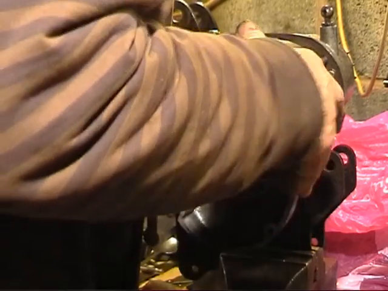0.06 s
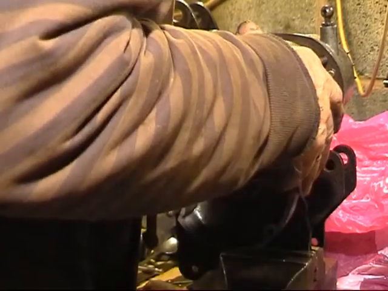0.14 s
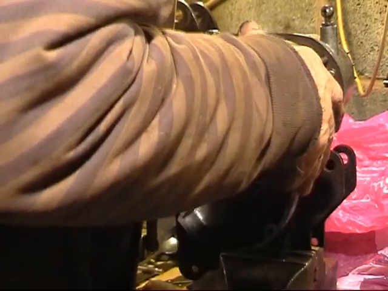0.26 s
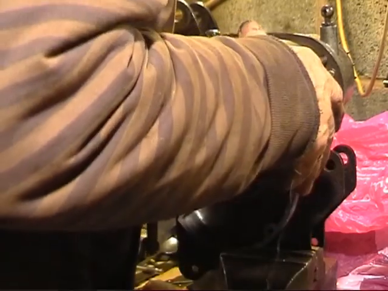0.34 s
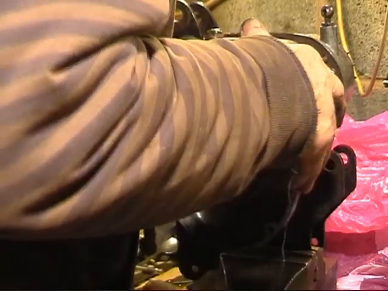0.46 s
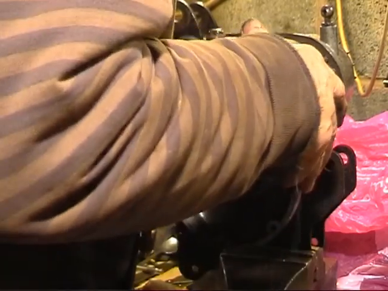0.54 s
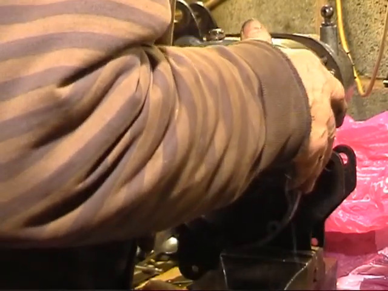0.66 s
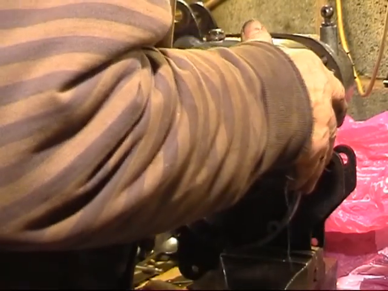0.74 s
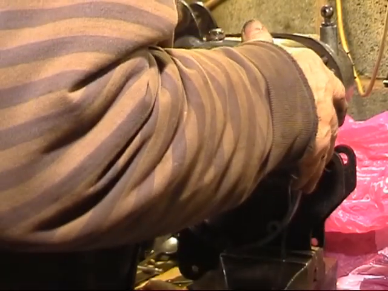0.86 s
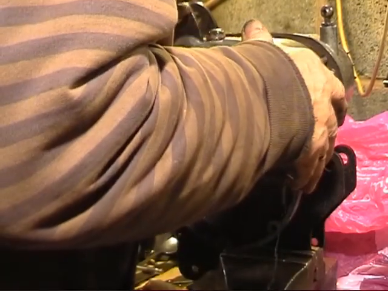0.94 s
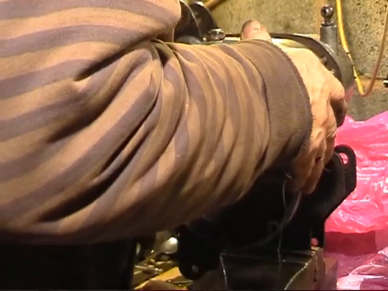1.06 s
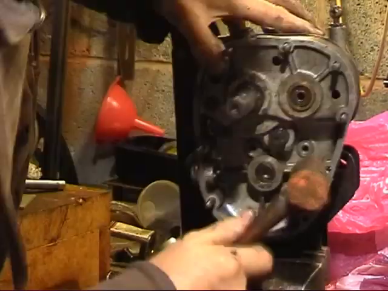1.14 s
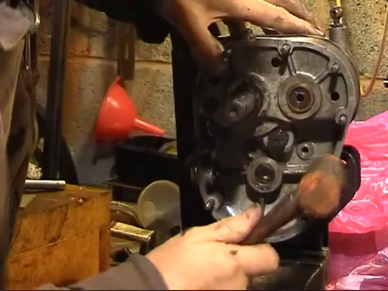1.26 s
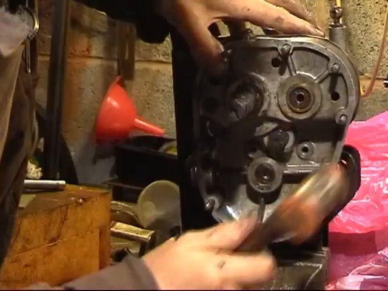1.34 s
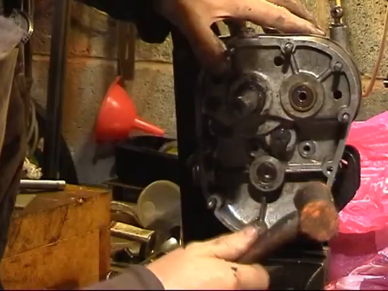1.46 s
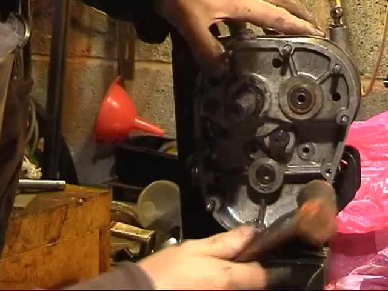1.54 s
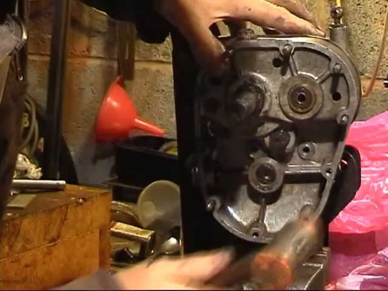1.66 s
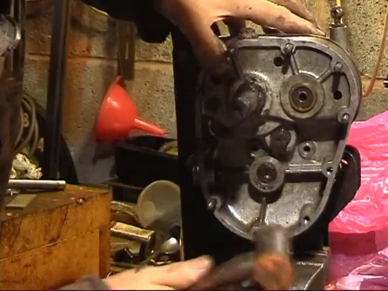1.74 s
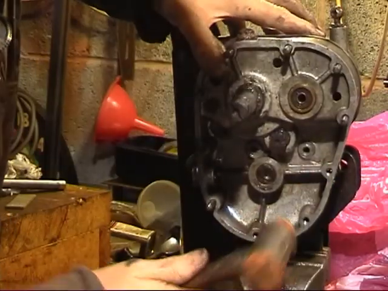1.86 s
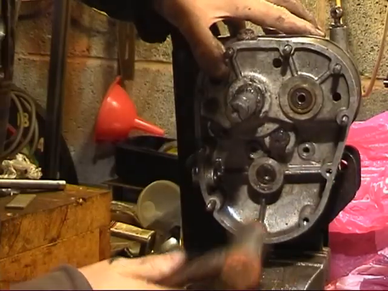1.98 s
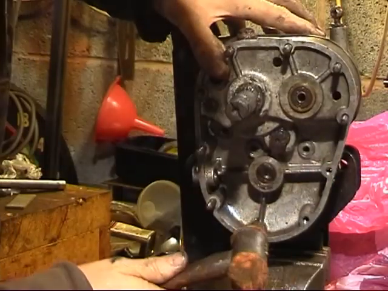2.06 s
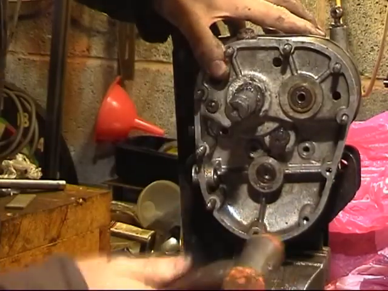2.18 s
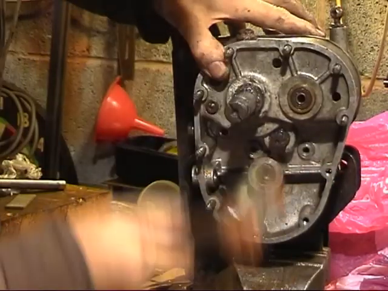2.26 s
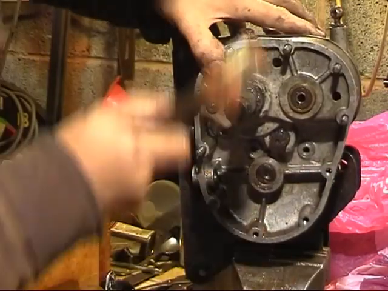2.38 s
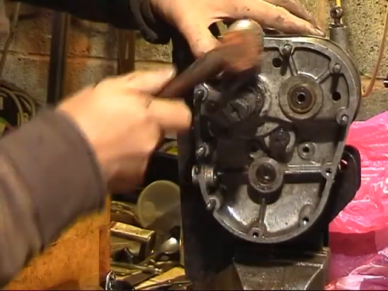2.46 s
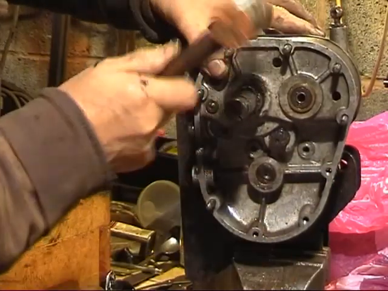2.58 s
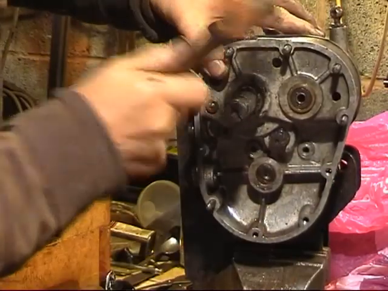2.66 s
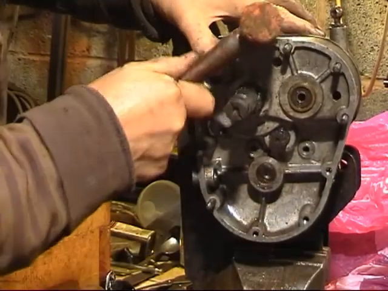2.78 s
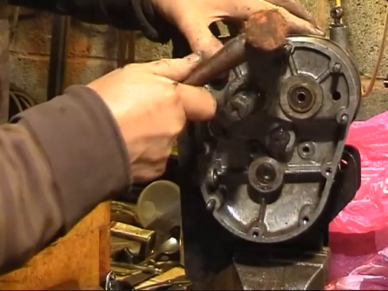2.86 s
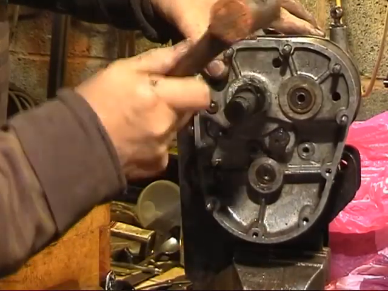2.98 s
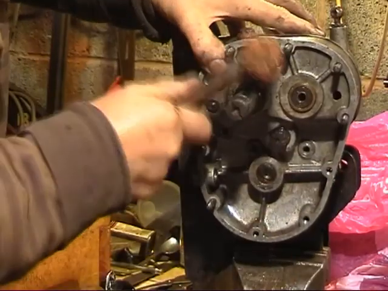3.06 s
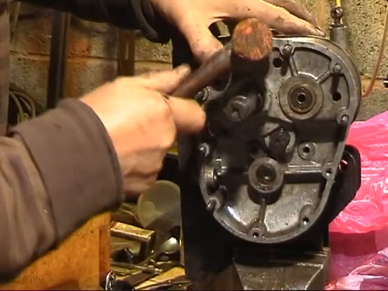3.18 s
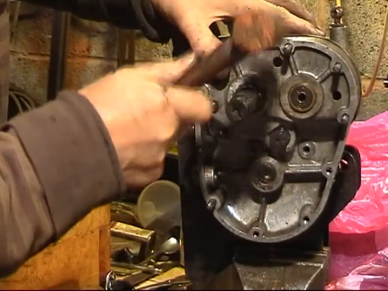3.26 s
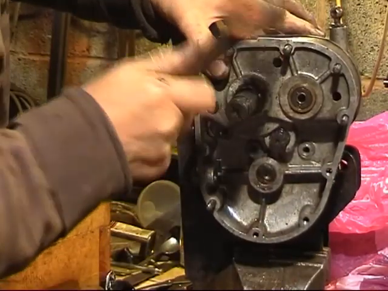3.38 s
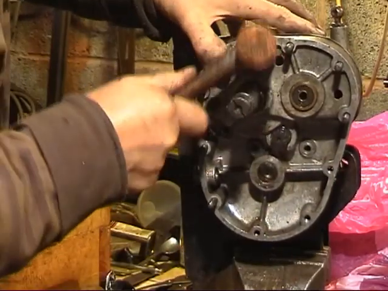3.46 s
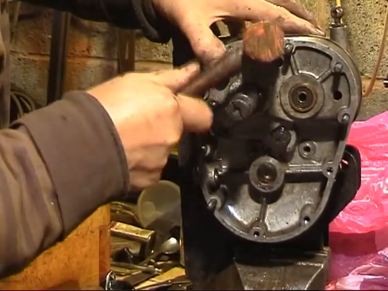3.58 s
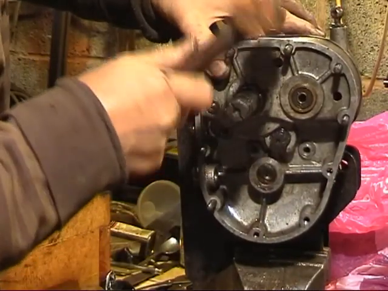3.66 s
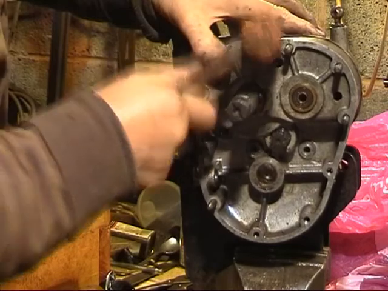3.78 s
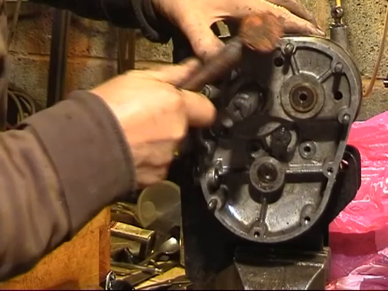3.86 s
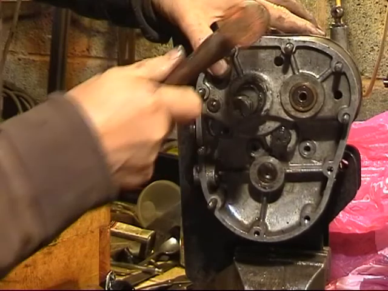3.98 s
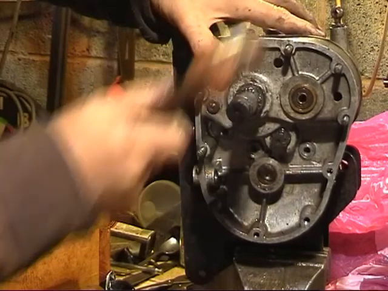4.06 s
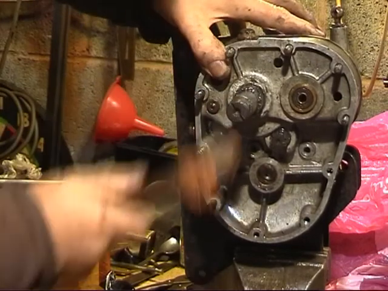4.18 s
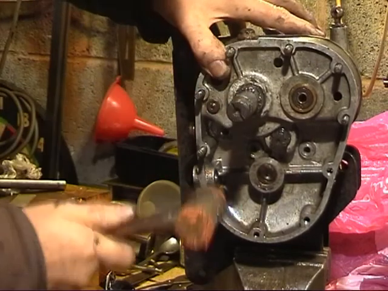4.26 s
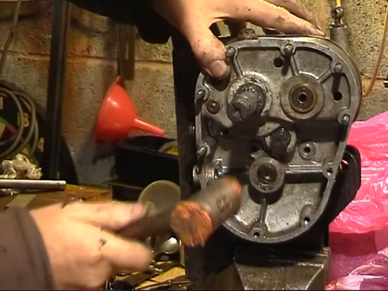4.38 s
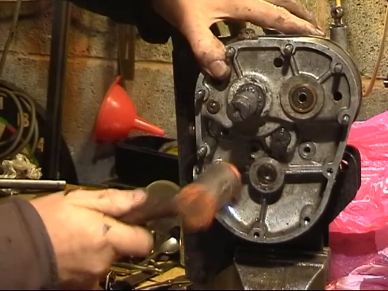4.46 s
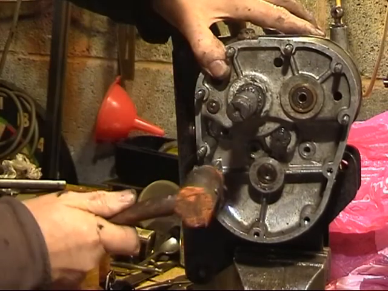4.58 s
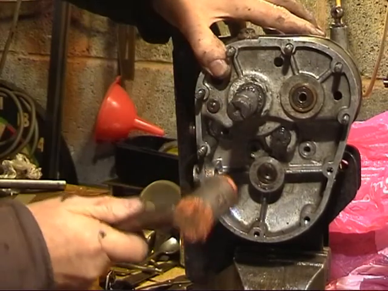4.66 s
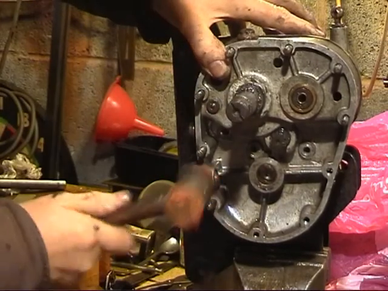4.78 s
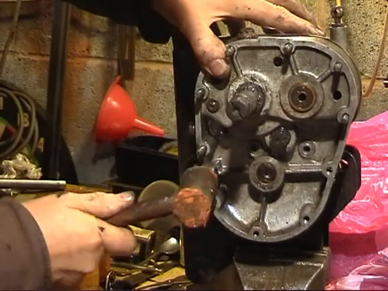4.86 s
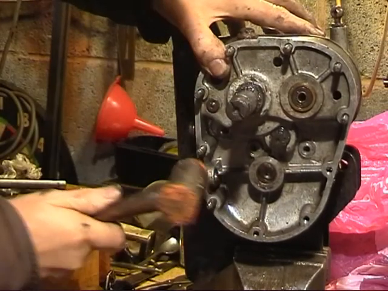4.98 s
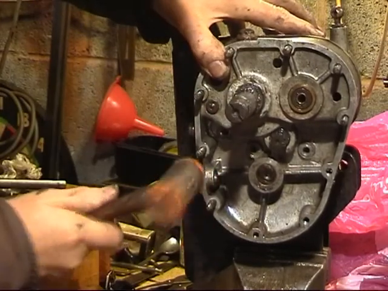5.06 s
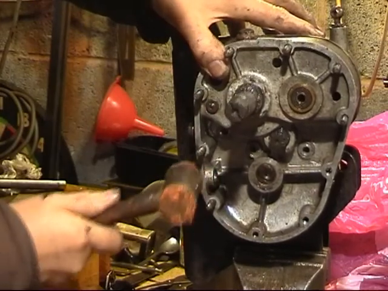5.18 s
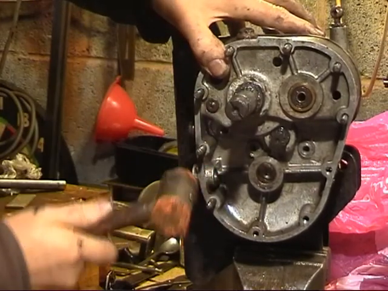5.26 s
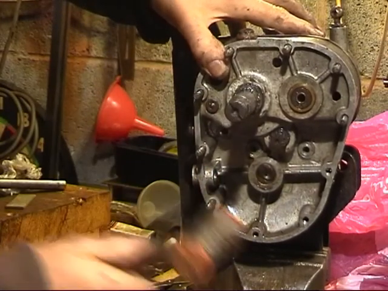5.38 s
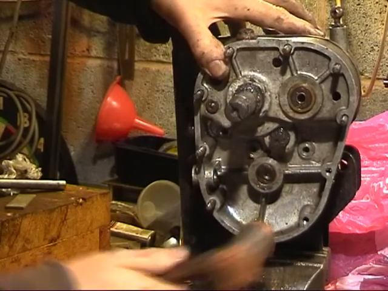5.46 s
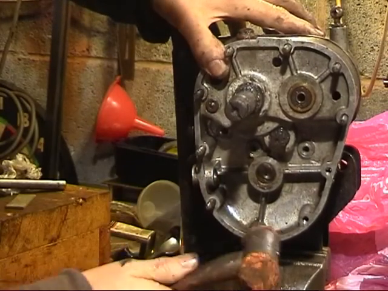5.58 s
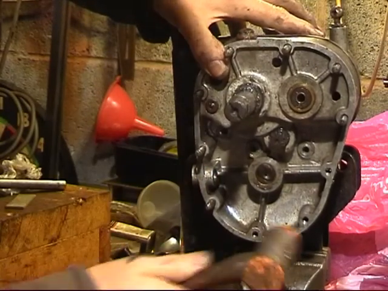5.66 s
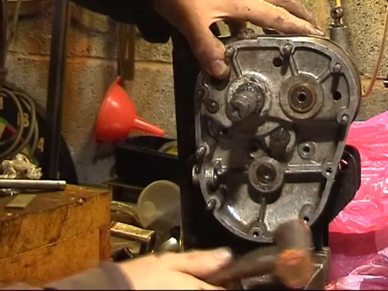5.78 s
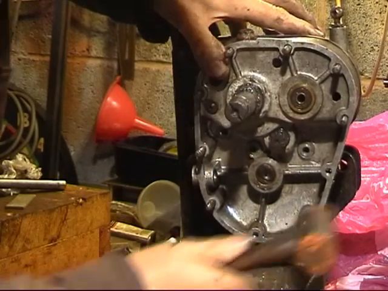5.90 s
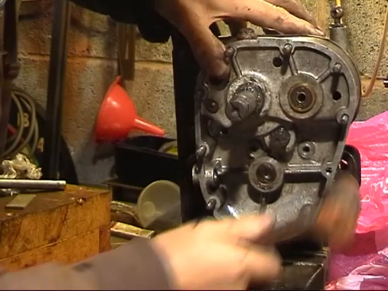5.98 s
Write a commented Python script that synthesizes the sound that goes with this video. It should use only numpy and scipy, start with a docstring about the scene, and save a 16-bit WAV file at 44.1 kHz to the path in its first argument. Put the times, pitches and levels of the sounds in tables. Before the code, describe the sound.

Close, dry mallet blows on a clamped metal gearbox casing, about three or four a second within each run. First only cloth scuffs and faint hum and hiss, then an instant of silence and the tail of a blow. Three full clanks, a thin squeak, four more with casing knocks, then a weak tap and five brighter blows. Short room reflections; the microphone distorts on the hardest hits.

```python
"""Hard blows of a mallet clang on a cast metal gearbox casing held in a vice, close by in a small workshop.
Each blow sums damped modes, decaying noise, a crack and a low thump, and the hardest overload the input.
Between them the casing knocks and loose parts tick as enveloped noise; wavering tones make one metal squeak.
A sleeve rustles as uneven noise. Faint steady tones hum under the hiss, which narrows after a brief dropout;
the dying tail of a blow is heard as the sound returns."""
import sys
import numpy as np
from scipy import signal
from scipy.fft import rfft, irfft, next_fast_len
from scipy.io import wavfile

SR = 44100
rng = np.random.default_rng(int(sys.argv[2]) if len(sys.argv) > 2 else 0)


def log_audio(samples):
    """Write samples as a 16-bit WAV file to the path given in sys.argv[1]."""
    # one column per channel
    frames = np.atleast_2d(samples).T
    # limit to full scale, then quantise
    limited = np.clip(frames, -1, 1)
    pcm = np.round(limited * 32767).astype(np.int16)
    wavfile.write(sys.argv[1], SR, pcm)


N = 265923
RING = np.arange(SR * 3 // 4) / SR  # seconds after a contact
DROPOUT_S, DROPOUT_LENGTH_S = 1.149, 0.013  # the sound drops out for an instant

# Reverberation of the workshop. Each row: frequency in Hz, t60 in seconds.
WORKSHOP_DECAY = [(80, 0.83), (190, 0.57), (320, 0.29), (520, 0.18), (1000, 0.18), (2300, 0.18),
                  (6000, 0.16), (12000, 0.15)]


def amp(db):
    """Decibels to gain."""
    return 10 ** (np.asarray(db) / 20)


def unit(x):
    """Scale to rms 1."""
    return x / np.sqrt(np.mean(x ** 2) + 1e-20)


def along(points, hz):
    """Read (Hz, value) points on a log frequency axis."""
    f, v = np.transpose(points)
    return np.interp(np.log(hz + 1), np.log(f + 1), v)


def filtered(x, response):
    """Multiply the spectrum of x by a response of frequency."""
    n = x.shape[-1]
    m = next_fast_len(n + 8192)
    spectrum = rfft(x, m) * response(np.fft.rfftfreq(m, 1 / SR))
    return irfft(spectrum, m)[..., :n]


def coloured(x, points):
    """Causal minimum-phase filter with the gain of the (Hz, dB) points."""
    size = 4096
    gain = amp(along(points, np.fft.rfftfreq(size, 1 / SR)))
    cepstrum = irfft(np.log(gain))
    # Folding the cepstrum forward in time gives minimum phase.
    cepstrum[1:size // 2] *= 2
    cepstrum[size // 2 + 1:] = 0
    impulse = irfft(np.exp(rfft(cepstrum)))
    return signal.fftconvolve(x, impulse)[:len(x)]


def noise(points, size):
    """Noise of rms 1, coloured by (Hz, dB) points."""
    return unit(filtered(rng.standard_normal(size), lambda hz: amp(along(points, hz))))


def dying(decay):
    """White noise split into overlapping bands, each dying at its own speed."""
    white = rng.standard_normal(len(RING))
    centres, t60s = np.transpose(decay)
    total = np.zeros(len(RING))
    for share, t60 in zip(np.eye(len(decay)), t60s):
        points = list(zip(centres, share))
        band = filtered(white, lambda hz: along(points, hz))
        total += band * amp(-60 * RING / t60)
    return total


def ring(modes, scatter_db):
    """Sum exponentially damped modes, each at a new strength and phase."""
    hz, db, t60 = np.transpose(modes)[:, :, None]
    t = RING[:len(RING) // 2]
    level = db + scatter_db * rng.standard_normal(hz.shape) - 60 * t / t60
    wave = amp(level) * np.sin(2 * np.pi * (hz * t + rng.random(hz.shape)))
    return np.pad(wave.sum(0), (0, len(RING) - len(t)))


def in_room(x, wet_db, gap=0.0072):
    """Add the workshop's answer, a noise tail that builds up over a few milliseconds (gap in seconds)."""
    tail = dying(WORKSHOP_DECAY) * (1 - np.exp(-(RING / gap) ** 2))
    answer = signal.fftconvolve(x, tail / np.linalg.norm(tail))[:len(x)]
    return x + amp(wet_db) * answer


def add(track, s, sound):
    """Mix a sound in at time s."""
    part = track[round(s * SR):][:len(sound)]
    part += sound[:len(part)]


def swell(s, length):
    """A smooth rise and fall of gain around time s."""
    return np.exp(-2 * ((np.arange(N) / SR - s) / length) ** 2)


def background():
    """Steady coloured hiss with constant sine tones for the faint hum and thin electrical whines."""
    # Hum and whines. Each row: frequency in Hz, relative level in dB.
    hum_tones = [(96.9, -73.5), (441.4, -81), (1050, -75.5), (2401, -75), (5701, -89), (6002, -77.5),
                 (6298, -86), (10799, -90.5)]
    # Colour of the hiss. Each row: frequency in Hz, relative level in dB.
    hiss_colour = [(15, -48.5), (25, -24.5), (55, -11), (97, -10.5), (200, -8.5), (263, -14.5), (293, -8),
                   (887, -12.5), (1070, -13.5), (1700, -17.5), (2480, -18.5), (2690, -19), (6210, -23.5),
                   (16000, -30)]
    t = np.arange(N) / SR
    hum = sum(amp(db - 1.5) * np.sin(2 * np.pi * (hz * t + rng.random())) for hz, db in hum_tones)
    return hum + amp(-65) * noise(hiss_colour, N)


def air_width():
    """Hiss that differs between the ears: a wide low rush at first, faint once the dropout begins."""
    # Colour before the dropout. Each row: frequency in Hz, relative level in dB.
    wide_colour = [(15, -36), (25, -8), (53, -0.5), (734, -8), (1190, -11), (1480, -11), (16000, -38)]
    # Colour from the dropout on. Each row: frequency in Hz, relative level in dB.
    narrow_colour = [(15, -33), (25, -5.5), (212, -5), (607, -11.5), (1520, -5.5), (1650, -10.5),
                     (16000, -15.5)]
    early = np.arange(N) / SR < DROPOUT_S
    wide = amp(-61.5) * noise(wide_colour, N)
    narrow = amp(-69) * noise(narrow_colour, N)
    return np.where(early, wide, narrow)


def sleeve():
    """Cloth flaps softly, scuffs, and crackles: noise bands whose uneven gain imitates catching fibres."""
    # Flaps as the arm swings. Each row: middle in seconds, length in seconds, relative level in dB.
    flap_moves = [(0.498, 0.075, -57), (0.6, 0.048, -62)]
    # Brushes of the sleeve. Each row: middle and length in seconds, relative scuff and crackle levels in dB.
    brush_moves = [(0.29, 0.041, -64, -69.5), (0.436, 0.029, -63.5, -56), (.53, 0.059, -57.5, -59.5),
                   (0.578, 0.01, -76, -62), (.835, 0.013, -74, -67), (0.938, 0.054, -58, -71),
                   (1.081, 0.027, -54.5, -68), (4.084, 0.047, -61, -64)]
    # Colour of the scuff. Each row: frequency in Hz, relative level in dB.
    scuff_colour = [(300, 1), (800, 0), (1600, 5.5), (2500, -10), (6000, -38)]
    # Colour of the crackle. Each row: frequency in Hz, relative level in dB.
    crackle_colour = [(1200, -20), (2800, 0.5), (5000, -1.5), (8000, -5), (15000, -32.5)]

    flap_gain = sum(amp(db) * swell(s, length) for s, length, db in flap_moves)
    scuff_gain = sum(amp(db) * swell(s, length) for s, length, db, _ in brush_moves)
    crackle_gain = sum(amp(db) * swell(s, length) for s, length, _, db in brush_moves)
    catches = amp(3.7 * noise([(60, 2.0), (300, -5.5), (1500, -74.5)], N))
    flap = noise([(40, 1.0), (110, 0.0), (180, 10.5), (350, -12), (900, -12.0), (3000, -66)], N)
    scuff = unit(np.sqrt(catches) * noise(scuff_colour, N))
    crackle = unit(catches * noise(crackle_colour, N))
    return flap_gain * flap + scuff_gain * scuff + crackle_gain * crackle


def blow_tail():
    """The dying tail of a mallet blow, decaying noise heard as the sound returns after the dropout."""
    # Parts of the tail. Each row: start in seconds, relative level in dB.
    blow_tails = [(1.164, -26), (1.237, -41.5)]
    # Colour of the tail. Each row: frequency in Hz, relative level in dB.
    blow_tail_colour = [(40, -16.5), (180, 1.5), (300, -8.5), (480, 7), (700, -1.5), (1500, -5), (3000, -9),
                        (7000, -19.5), (11000, -33.5), (16000, -45)]
    out = np.zeros(N)
    for s, db in blow_tails:
        envelope = amp(-60 * RING / 0.064) * (1 - np.exp(-RING / 0.0041))
        tail = noise(blow_tail_colour, len(RING)) * envelope
        add(out, s, amp(db + 4.0) * in_room(tail, wet_db=-5.0))
    return out


def bench():
    """The bench top hums after some blows: low sines that swell and decay."""
    # Hums of the bench. Each row: start in seconds, pitch in Hz, relative level in dB.
    bench_hums = [(3.087, 172.3, -41), (4.564, 182.3, -44), (5.629, 209, -51.5)]
    out = np.zeros(N)
    for s, hz, db in bench_hums:
        envelope = amp(-60 * RING / 0.22) * (1 - np.exp(-RING / .03))
        add(out, s, amp(db + 10.5) * np.sin(2 * np.pi * hz * RING) * envelope)
    return out


def rattles():
    """Dull noise knocks as the casing rocks and settles in the jaws, and tiny ticks of loose parts."""
    # Knocks of the casing. Each row: start in seconds, relative level in dB.
    casing_knocks = [(1.358, -40.5), (3.15, -35.5), (3.516, -32.5), (3.668, -40), (3.887, -33),
                     (4.044, -42.5)]
    # Colour of a knock. Each row: frequency in Hz, relative level in dB.
    knock_colour = [(60, -28), (200, -6.5), (500, 1), (850, -0.5), (1400, -13.5), (3000, -30),
                    (9000, -31.5)]
    # Ticks of loose parts. Each row: start in seconds, relative level in dB.
    loose_ticks = [(1.0755, -42.5), (1.143, -45), (1.3447, -39.5), (1.945, -42), (2.801, -38.5),
                   (3.138, -37), (3.2251, -46.5), (3.594, -42), (3.9555, -37), (5.1781, -30)]
    # Colour of a tick. Each row: frequency in Hz, relative level in dB.
    tick_colour = [(500, -38), (3000, -24.5), (6500, 4.5), (9000, -8.5), (15000, -29)]
    out = np.zeros(N)
    for s, db in casing_knocks:
        envelope = amp(-60 * RING / 0.25) * (1 - np.exp(-RING / 0.0014))
        add(out, s, amp(db - 8.5) * noise(knock_colour, len(RING)) * envelope)
    for s, db in loose_ticks:
        tick = noise(tick_colour, len(RING)) * amp(-60 * RING / 0.009)
        add(out, s, amp(db - 8) * tick)
    return in_room(out, wet_db=-8.5)


def squeak():
    """Metal slides on metal: dry friction makes a few steel tones waver and flutter, with grit around them."""
    # Steel tones. Each row: pitch in Hz, rms waver of the pitch in Hz, relative level in dB.
    steel_tones = [(4425, 40, -.5), (5290, 50, -2), (5470, 50, -1), (8800, 90, -12)]
    peak_s, attack_s, t60_s = 2.463, .014, 0.13

    def waver():
        return noise([(60, 3.0), (250, -6.5), (1000, -64)], N)

    tones = np.zeros(N)
    for hz, width, db in steel_tones:
        flutter = amp(db + 3 * waver())
        tones += flutter * np.sin(2 * np.pi * np.cumsum(hz + width * waver()) / SR)
    grit = noise([(200, -8.5), (900, 3), (3000, -2.5), (6000, 0.5), (10000, -10), (15000, -20.0)], N)
    t = np.arange(N) / SR - peak_s
    attack = np.exp(-(np.minimum(t, 0) / attack_s) ** 2)
    envelope = attack * amp(-60 * np.maximum(t, 0) / t60_s)
    return amp(-41) * envelope * (unit(tones) + amp(-12.5) * grit)


def spot_colour(strength_db, spot_hz, treble_db):
    """Colour of one blow: the struck spot lifts modes near its pitch, contact hardness sets the treble."""
    spot_db, spot_octaves = 5.5, 0.6  # lift and reach of the favoured pitch
    treble_hz = 2190  # the treble shelf takes over around here
    hz = np.geomspace(100, 16000, 40)
    favoured = spot_db * np.exp(-(np.log2(hz / spot_hz) / spot_octaves) ** 2)
    treble = treble_db / (1 + (treble_hz / hz) ** 6)
    return np.column_stack([hz, strength_db + favoured + treble])


def mallet():
    """Each blow cracks, rings the casing's modes and gives a low push; returns direct and room sound."""
    # Mallet blows. Each row: start in seconds, relative strength in dB, pitch the struck spot favours in Hz,
    # treble shelf in dB, relative thump level in dB.
    blows = [(1.4350, -17.5, 630, 4, -41.5), (1.7216, -16, 540, 2, -22), (1.9882, -14.5, 520, -0.5, -24),
             (2.7073, -20, 525, 2.5, -41), (3.05, -19.5, 1600, -1, -44), (3.4195, -18.5, 989, -0.5, -38),
             (3.7827, -19, 770, -1, -27.5), (4.5436, -37.5, 950, 5, -60), (4.7886, -15.5, 860, -1.5, -44.5),
             (5.0903, -20, 1100, -4, -48), (5.492, -18, 1270, 2, -45.5), (5.7528, -17.5, 1340, -3.5, -55),
             (6.0217, -16, 1300, -2.5, -45)]
    # Main modes of the casing. Each row: pitch in Hz, relative level in dB, t60 in seconds before the extra
    # damping.
    casing_modes = [(436.4, -8, 0.092), (517.5, 1, .11), (553.6, 2, 0.055), (657, -5.5, .11),
                    (824, -3, 0.02), (864, -2, 0.052), (946, -11, 0.047), (1007, -10, 0.076),
                    (1011.7, -4, 0.11), (1068, -7.5, 0.12), (1118, -12.5, 0.1), (1368, -6, 0.063),
                    (1452.5, -11, 0.48), (1503, -5, 0.16), (1565, -7, 0.29), (1653, -8.5, .13),
                    (1733, -8, 0.15), (1851, -8.5, 0.1), (1982, -7, 0.12), (2197, -9.5, 0.13),
                    (2271, -9.5, 0.23), (2494, -13.5, 0.23), (2664, -14, 0.37), (3430, -15.5, 0.21),
                    (3594, -8.5, 0.038), (3627, -16.5, .16), (4360, -11.5, .09), (4732, -19, 0.1),
                    (5530, -20, 0.13)]
    # Colour of the crowded modes, and of the room's answer. Each row: frequency in Hz, relative level in dB.
    clang_colour = [(40, -30.5), (95, -14.5), (145, -21.5), (185, -5), (245, -2), (305, -17.5), (410, 1.5),
                    (540, -2), (610, -12), (850, 1), (1500, -1.5), (2300, 0.5), (3000, -6), (4000, -6),
                    (7000, -9.5), (14000, -36)]
    # Decay of the crowded modes. Each row: frequency in Hz, t60 in seconds.
    clang_decay = [(100, .05), (500, 0.15), (1500, 0.039), (3000, 0.066), (9000, .03)]
    # Colour of the contact crack. Each row: frequency in Hz, relative level in dB.
    crack_colour = [(60, -40), (300, -8.5), (700, 2.5), (1500, -0.5), (5000, -10), (15000, -26)]
    # Colour of the low push. Each row: frequency in Hz, relative level in dB.
    thump_colour = [(25, -24), (70, -2.5), (170, -7), (240, -2), (320, -24), (2000, -67.5)]
    extra_t60_s = .22  # extra damping of the main modes

    direct, room = np.zeros(N), np.zeros(N)
    for s, strength_db, spot_hz, treble_db, thump_db in blows:
        modes = amp(-0.5) * ring(casing_modes, scatter_db=2.0) * amp(-60 * RING / extra_t60_s)
        clang = amp(12.5) * coloured(dying(clang_decay), clang_colour)
        crack_gain = amp(15.5 + 0.29 * strength_db)  # harder blows crack more
        crack = crack_gain * noise(crack_colour, len(RING)) * amp(-60 * RING / 0.021)
        thump = amp(thump_db + 4.5) * noise(thump_colour, len(RING)) * amp(-60 * RING / 0.055)

        # Walls and shelves answer in clusters.
        clumps = amp(3.8 * noise([(40, -1.5), (150, -9), (600, -69.5)], len(RING)))
        build_up = 1 - np.exp(-RING / 0.027)
        diffuse = amp(3.5) * coloured(dying(WORKSHOP_DECAY), clang_colour) * clumps * build_up

        spot = spot_colour(strength_db, spot_hz, treble_db)
        add(direct, s, coloured(in_room(modes, wet_db=-8.5) + clang + crack, spot))
        add(direct, s, thump)
        add(room, s, coloured(diffuse, spot))
    return direct, room


def scene():
    """Two close capsules hear the blows nearly alike; scattered sound differs between them, most in the treble."""
    # Level of the side signal. Each row: frequency in Hz, gain in dB.
    side_spread = [(100, -24), (400, -25.5), (1000, -15.5), (2000, -9), (6000, -7.5), (9000, 0),
                   (14000, -0.5)]
    direct, room = mallet()
    around = room + blow_tail() + bench() + rattles() + squeak() + sleeve()
    turns = np.cumsum(rng.standard_normal(size=240)) / 4  # side phase wanders over frequency

    def side_response(hz):
        phase_turns = np.interp(hz, np.linspace(0, SR / 2, len(turns)), turns)
        return amp(along(side_spread, hz)) * np.exp(2j * np.pi * phase_turns)

    side = filtered(amp(-8.5) * direct + around, side_response) + air_width()
    mid = direct + around + background()
    t = np.arange(N) / SR - DROPOUT_S
    heard = (t < 0) | (t > DROPOUT_LENGTH_S)
    return heard * np.array([amp(4.5) * (mid + side), amp(5.5) * (mid - side)])


def record(dry, top=0.7, hardness=6):
    """The input overloads on hard blows; coupling tilts the flat tops, and the band ends steeply."""
    # Treble response of the microphone. Each row: frequency in Hz, gain in dB.
    microphone_response = [(7000, -2.5), (11000, -2.5), (14000, -9.5), (16000, -8.5)]
    coupling_hz, top_hz = 90, 16100
    clipped = dry / (1 + np.abs(dry / top) ** hardness) ** (1 / hardness)

    def coupling(hz):
        high_pass = 1j * hz / (coupling_hz + 1j * hz)
        return amp(along(microphone_response, hz)) * high_pass

    coupled = filtered(clipped, coupling)
    return filtered(coupled, lambda hz: 1 / (1 + (hz / top_hz) ** 100))


dry = scene()
out = record(dry)
log_audio(out)
```